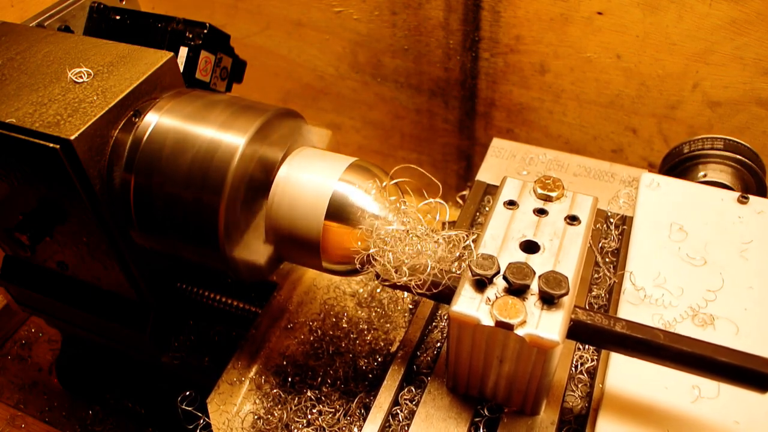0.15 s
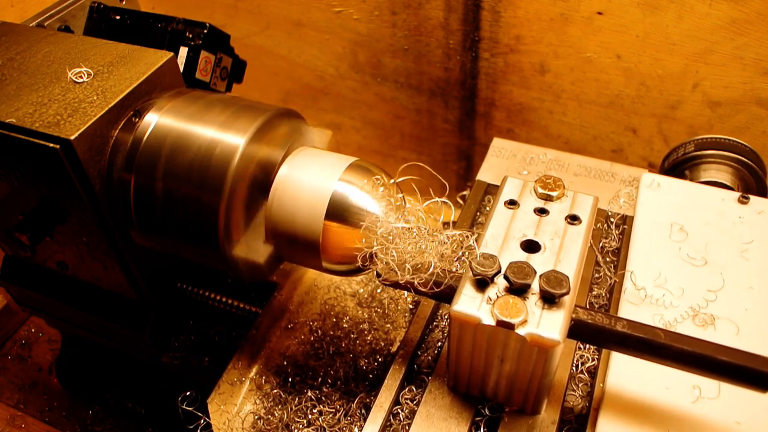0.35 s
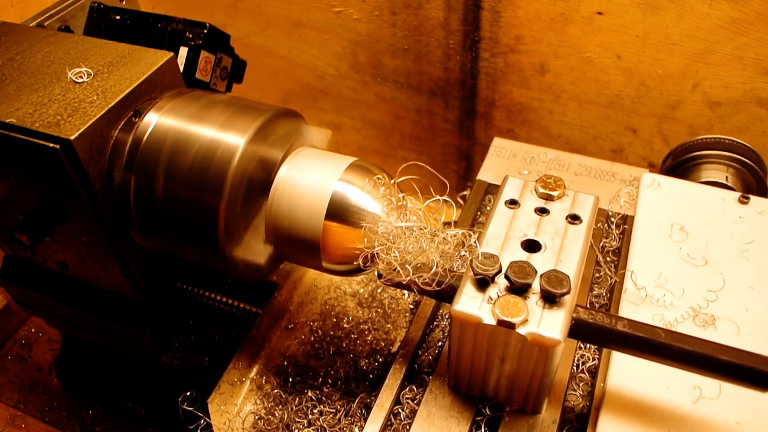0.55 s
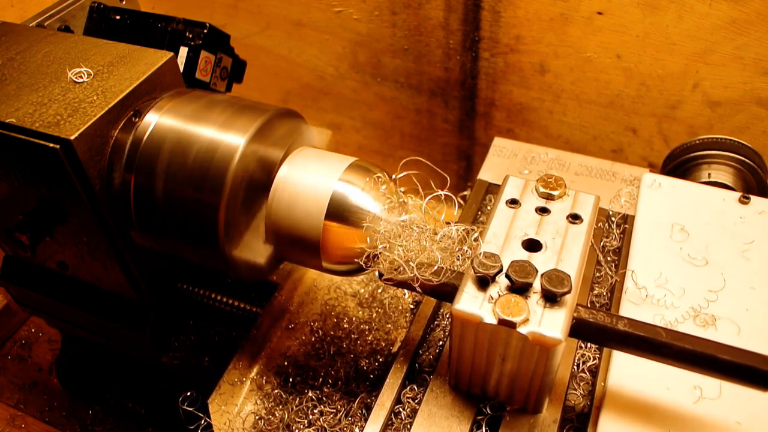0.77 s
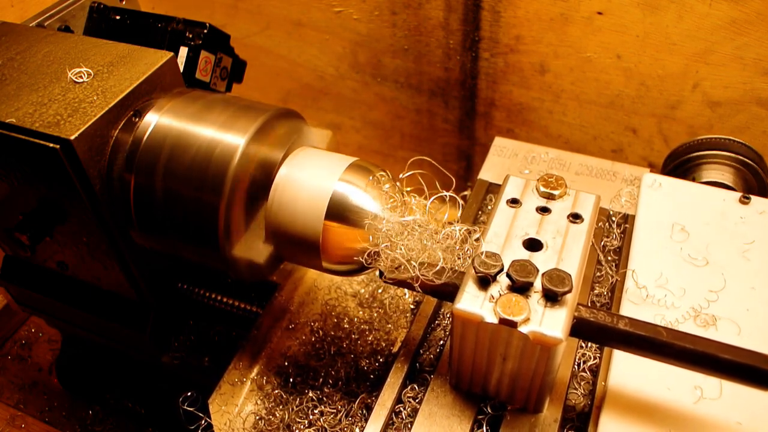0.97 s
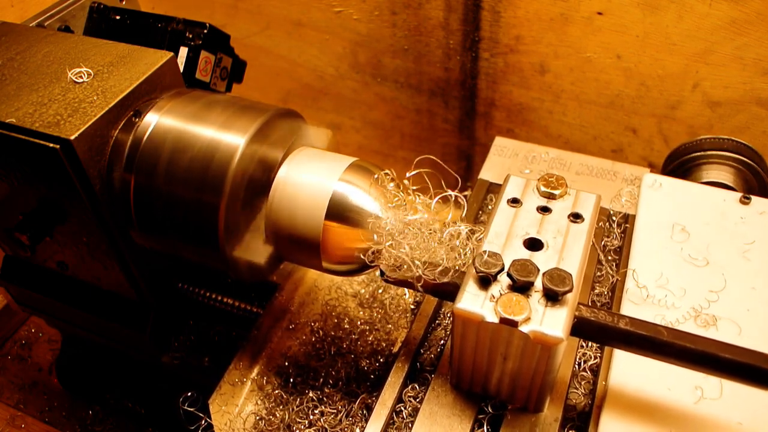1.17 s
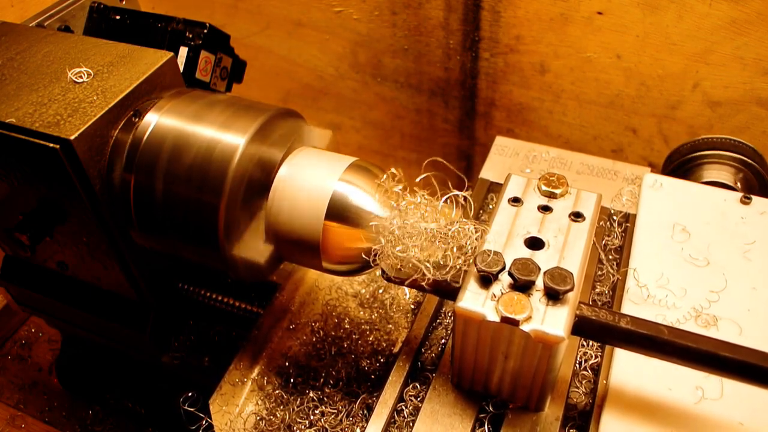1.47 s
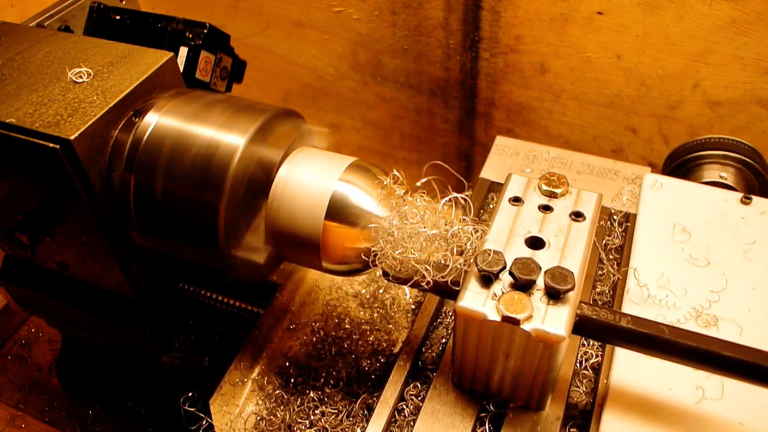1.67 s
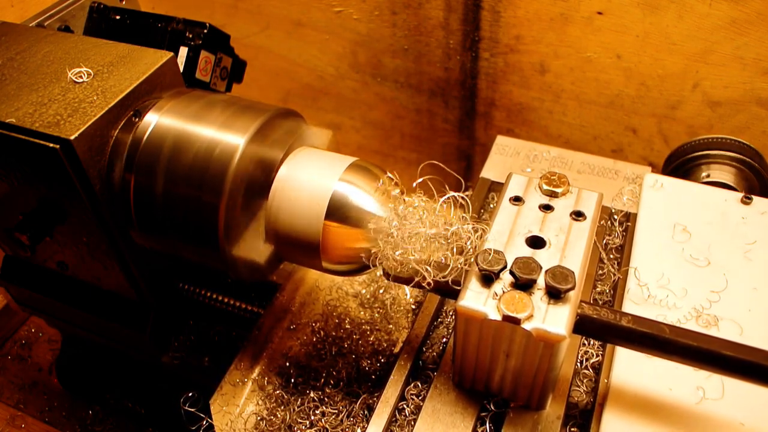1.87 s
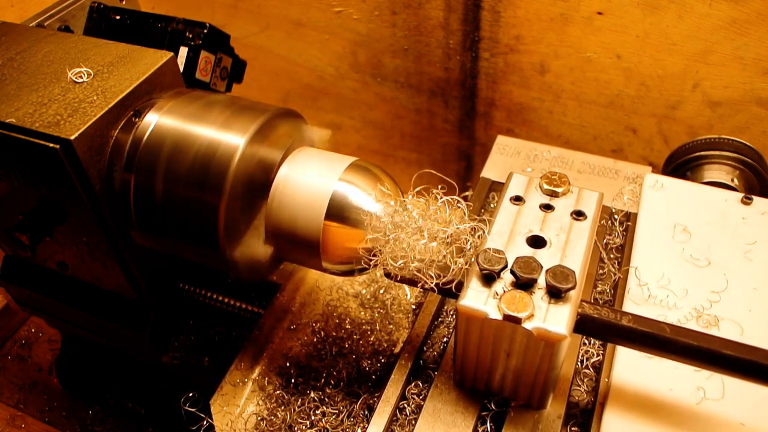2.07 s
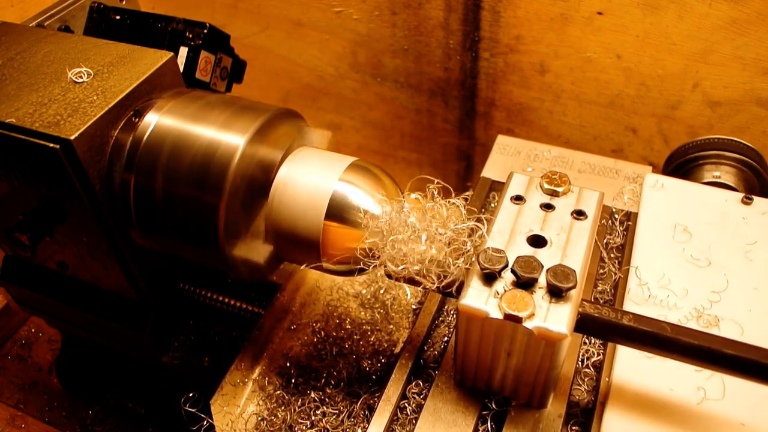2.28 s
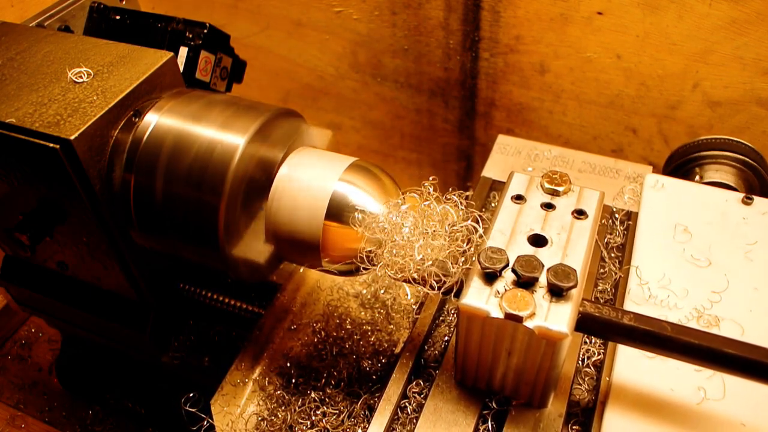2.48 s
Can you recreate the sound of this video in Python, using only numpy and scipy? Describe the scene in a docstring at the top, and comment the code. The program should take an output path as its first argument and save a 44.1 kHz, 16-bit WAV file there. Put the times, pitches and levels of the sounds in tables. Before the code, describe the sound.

Small metal lathe running steadily, buzzing belt whirr, hissing cut, thin high whine, ticking metal curls

```python
"""Small lathe turning metal

A small lathe turns metal at a constant speed, close by in a workshop.
The motor hums (a sine) over bearing rush (shaped noise); the drive whines high above in sidebands.
The toothed belt whirrs: a noise loop repeats every lap under tones locked to the lap.
The cut hisses (shaped noise) and rings the steel; swarf ticks as cracks with decaying sines."""
import sys
import numpy as np
from scipy.fft import rfft, irfft, next_fast_len
from scipy.io import wavfile
from scipy.ndimage import map_coordinates

SR = 44100
rng = np.random.default_rng(int(sys.argv[2]) if len(sys.argv) > 2 else 0)


def wrap_up_sound(samples):
    """Save the sound to the file named by the first command line argument, as 16-bit audio."""
    columns = np.atleast_2d(samples).T
    # keep every value between -1 and 1, then stretch to whole-number steps
    tamed = np.clip(columns, -1, 1)
    steps = np.round(tamed * 32767).astype(np.int16)
    wavfile.write(sys.argv[1], SR, steps)


N = 115983
TIME_S = np.arange(N) / SR
MOTOR_HZ = 64.865

# ringing modes of tool and swarf: (frequency [Hz], t60 [s], level [dB], left-right [dB])
STEEL_MODES = [(3134, 0.031, 0.5, -8.5), (3362, 0.051, 4.5, 1), (3660, 0.023, -2, 1), (4290, 0.036, -2, -2),
               (5250, .05, -13, -11), (6800, 0.032, 0.5, 10)]


def amp(db):
    """Amplitude gain of a level in dB."""
    return 10 ** (np.asarray(db) / 20)


def along(points, hz):
    """Interpolate (frequency [Hz], value) points on a log frequency axis."""
    point_hz, value = np.transpose(points)
    return np.interp(np.log(hz + 1), np.log(point_hz + 1), value)


def pan(left_right_db):
    """Left and right gains of unit mean power."""
    gains = amp(np.array([[.5], [-.5]]) * left_right_db)
    return gains / np.sqrt(np.mean(gains ** 2, axis=0))


def wobble(knots_per_s):
    """Smooth random curve: a spline through normal random knots."""
    knots = rng.standard_normal(int(N * knots_per_s / SR) + 4)
    return map_coordinates(knots, [np.arange(N) * knots_per_s / SR])


def shaft():
    """Motor shaft angle in radians, at constant speed."""
    return 2 * np.pi * MOTOR_HZ * TIME_S


def noise(spectrum, size):
    """Stereo noise loop, size samples long: (frequency [Hz], level [dB per Hz]) shapes its spectrum."""
    # left-right correlation, clipped to -1..1: (frequency [Hz], correlation [1])
    likeness = [(30, -0.5), (120, 2.5), (350, 1.2), (700, 0.56), (1600, 0.6), (3500, 0.33), (6000, -0.01),
                (15000, 0)]
    # stereo balance: (frequency [Hz], left-right [dB])
    balance = [(100, -9.5), (1000, -1.5), (1750, -3.5), (2800, 0), (6000, -0.5), (8300, 2.5), (11000, 5.5),
               (15000, 2.5)]
    hz = np.fft.rfftfreq(size, 1 / SR)
    mid_side_rad = np.arccos(np.clip(along(likeness, hz), -1, 1)) / 2
    shaped = rfft(rng.standard_normal((2, size))) * amp(along(spectrum, hz))
    mid, side = shaped * [np.cos(mid_side_rad), np.sin(mid_side_rad)]
    left_right = np.array([mid + side, mid - side]) * pan(along(balance, hz))
    return irfft(left_right, size) * np.sqrt(SR / 2)  # scales to dB per Hz


def tone(angle_rad, level_db, left_right_db, left_lead_rad):
    """Stereo sine, level as RMS; its phase on the left leads the right by left_lead_rad."""
    phase = angle_rad + np.array([[.5], [-.5]]) * left_lead_rad
    return np.sqrt(2) * amp(level_db) * pan(left_right_db) * np.sin(phase)


def motor():
    """The motor hums at twice the shaft rate over the broadband rush of bearings and frame."""
    # hum level: (time [s], level [dB])
    hum_level = [(0, -33.5), (.07, -33.5), (.34, -34.5), (.53, -32), (1.32, -33.5), (1.61, -38),
                 (2.1, -35.5), (2.6, -34.5)]
    # bearing and frame rush: (frequency [Hz], level [dB per Hz])
    rush_spectrum = [(20, -92), (55, -79), (90, -72), (132, -65), (190, -74), (260, -73.5), (400, -69),
                     (650, -69.5), (1000, -66.5), (1330, -69.5), (1700, -59), (1900, -61), (2200, -66),
                     (3000, -69), (6000, -105)]
    waver_db = .4 * wobble(8.8)
    level_db = np.interp(TIME_S, *np.transpose(hum_level)) + waver_db
    hum = tone(2 * shaft(), level_db, left_right_db=-1.2, left_lead_rad=-0.2)
    return hum + noise(rush_spectrum, size=N)


def belt():
    """Teeth run over the pulleys: a rough pattern repeats each lap, with tones that swell once a lap."""
    # whirr: (frequency [Hz], level [dB per Hz])
    whirr_spectrum = [(30, -100), (170, -94), (250, -76.5), (400, -68.5), (600, -64), (780, -68.5),
                      (1050, -61), (1300, -60.5), (1700, -68.5), (1900, -62.5), (2150, -69.5),
                      (2550, -75.5), (3100, -63.5), (4000, -75.5), (8000, -76)]
    # shaft, pulley and tooth tones:
    # (multiple of shaft rate [1], level [dB], left-right [dB], left lead [rad])
    tones = [(4, -52, -1, 0), (5, -43.5, -2, 0), (6, -44.5, 0, 0), (9, -40, 0, 0), (10, -41.5, -1, 0),
             (12, -47, 1, 0), (13, -41.5, -2, 0), (13.2, -42.5, -2, 0), (15, -38, 8, 2.4),
             (17, -37.5, -2, 0), (17.4, -45, -4, 0), (19, -43, -1, 0), (20, -44.5, -4, 0),
             (22, -38, 1, -.2), (22.2, -45, -2, 0), (22.5, -41, 0, 1), (23, -40, -4, .8), (24, -35, 0, 1.3),
             (25, -34, -10, -1), (25.2, -44, -15, 0), (25.8, -40, -7, .5), (26, -30, -7, -.6),
             (26.5, -41, -13, 1.9), (27.5, -44, 0, 0), (28, -33, -4, .6), (29, -38.5, -3, -.5),
             (29.5, -43, -13, -1.2), (30.5, -47, -3, .5), (33.5, -52, 0, 0)]
    turns_per_lap = 10
    pulley_depth, teeth_depth = 0.26, 0.17
    lap_swell_db, waver_depth_db, drift_depth_rad = 1.5, 1.67, 0.14
    # high tones cross the frame sooner, smearing the teeth into an even buzz
    dispersion_rad = .59  # per multiple squared
    ease_db_per_s = 0.35  # quietens slowly as the load eases

    angle = shaft()
    lap = noise(whirr_spectrum, size=round(SR * turns_per_lap / MOTOR_HZ))
    whirr = lap[:, np.arange(N) % lap.shape[1]]
    # one pulley turn takes two shaft turns
    pulse = 1 + pulley_depth * np.sin(angle / 2) + teeth_depth * np.sin(2 * angle)
    out = whirr * pulse
    for multiple, db, left_right_db, left_lead_rad in tones:
        locked = round(multiple * turns_per_lap) / turns_per_lap  # whole cycles per lap
        lap_phase = angle / turns_per_lap + rng.uniform(0, 2 * np.pi)
        level_db = db + lap_swell_db * np.sin(lap_phase) + waver_depth_db * wobble(6.37)
        drift_rad = drift_depth_rad * wobble(6.34)
        phase = locked * angle + dispersion_rad * locked ** 2 + drift_rad
        out = out + tone(phase, level_db, left_right_db, left_lead_rad)
    return out * amp(-ease_db_per_s * (np.arange(N) - N / 2) / SR)  # 0 dB at mid-scene


def drive():
    """The switched motor current sings in thin lines, offset from the switching rate by shaft rates."""
    # offset of each line from the switching rate: (offset [shaft rates])
    sidebands = [-9, -3, 2, 3, 6, 9]
    # one row per sideband: (level [dB], left-right [dB], left lead [rad])
    lines = [(-36.5, 3, 3.1), (-26.5, 9, .5), (-49, 5, .9), (-33.5, 4, -2.2), (-48, 7, .2), (-38, 11, 1.6)]
    switch_hz = 11055.7
    carrier = 2 * np.pi * switch_hz * TIME_S
    waver_db = 0.98 * wobble(6.73)  # shared by all lines
    out = np.zeros((2, N))
    for offset, (db, left_right_db, left_lead_rad) in zip(sidebands, lines):
        phase = carrier + offset * shaft() + rng.uniform(0, 2 * np.pi)
        out += tone(phase, db + waver_db, left_right_db, left_lead_rad)
    return out


def cut():
    """The tool shears the metal: hiss, steel modes kept ringing, a slight swell each turn of the work."""
    # hiss: (frequency [Hz], level [dB per Hz])
    hiss_spectrum = [(300, -101), (1500, -71.5), (2600, -71.5), (3150, -62.5), (4500, -62.5), (6000, -63),
                     (7200, -63.5), (8600, -67.5), (11000, -61.5), (12300, -65.5), (14000, -66.5),
                     (15700, -70.5)]
    ring_db_per_hz = -60.5  # at a mode's peak, before its own level
    pulse_depth, waver_depth_db = 0.049, 0.78
    f = np.fft.rfftfreq(N, 1 / SR)
    response = 0
    for hz, t60_s, db, left_right_db in STEEL_MODES:
        resonance = 1 / (1 + 2j * np.pi * (f - hz) * t60_s / np.log(1000))
        response = response + amp(db) * pan(left_right_db) * resonance
    ring = irfft(rfft(rng.standard_normal((2, N))) * response, N)
    ring = ring * amp(ring_db_per_hz) * np.sqrt(SR / 2)
    pulse = 1 + pulse_depth * np.sin(shaft() / 2)  # work turns at half the shaft rate
    return (noise(hiss_spectrum, size=N) + ring) * pulse * amp(waver_depth_db * wobble(14))


def swarf():
    """Curls tap the tool at random: each tap is a noise crack and a short ring of the steel modes."""
    # a curl catches: (time [s], ring level before mode levels [dB], crack over that level [dB])
    snags = [(1.12, -26.5, -4)]
    taps_per_s, tap_db, tap_spread_db, crack_over_tap_db = 50, -45, 1, 15
    crack_t60_s = .003
    t = np.arange(SR // 10) / SR
    out = np.zeros((2, N + len(t)))
    taps = []
    for _ in range(int(taps_per_s * N / SR)):
        time_s = rng.random() * N / SR
        level_db = tap_db + tap_spread_db * rng.standard_normal()
        taps.append((time_s, level_db, crack_over_tap_db))
    for time_s, level_db, crack_db in snags + taps:
        ring = 0
        for hz, t60_s, mode_db, left_right_db in STEEL_MODES:
            left_lead_rad = rng.uniform(-0.81, 1.5)
            decay_db = mode_db - 60 * t / t60_s
            ring = ring + tone(2 * np.pi * hz * t, decay_db, left_right_db, left_lead_rad)
        crack = amp(crack_db - 60 * t / crack_t60_s) * rng.standard_normal((2, len(t)))
        start = int(time_s * SR)
        out[:, start:start + len(t)] += amp(level_db) * (ring + crack)
    return out[:, :N]


def scene():
    """All sources run at once."""
    return motor() + belt() + drive() + cut() + swarf()


def record(dry):
    """Sharp low-pass: nothing remains above the band limit."""
    top_hz = 15740
    size = next_fast_len(N + SR // 2)  # zero padding against wrap-around
    passband = np.fft.rfftfreq(size, 1 / SR) < top_hz
    return irfft(rfft(dry, size) * passband, size)[:, :N]


dry = scene()
out = record(dry)
wrap_up_sound(out)
```